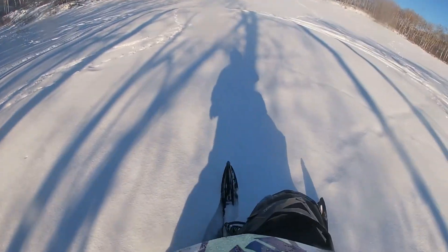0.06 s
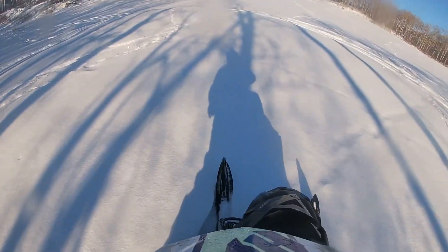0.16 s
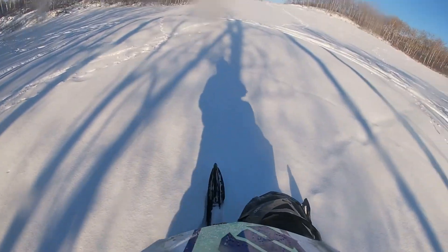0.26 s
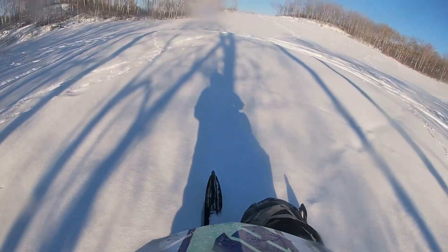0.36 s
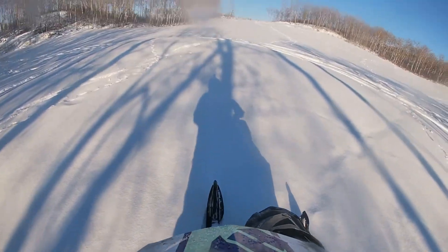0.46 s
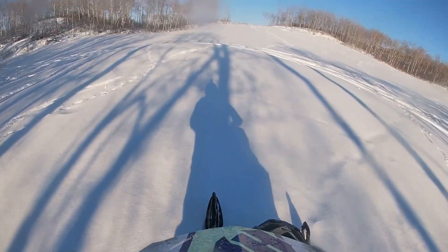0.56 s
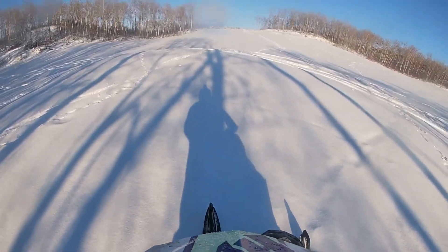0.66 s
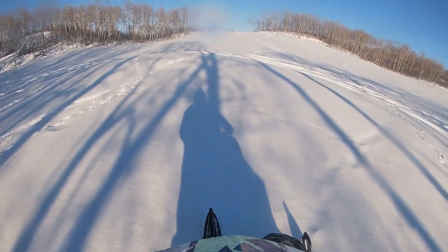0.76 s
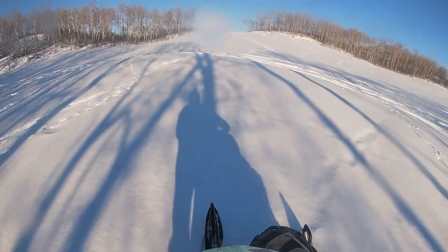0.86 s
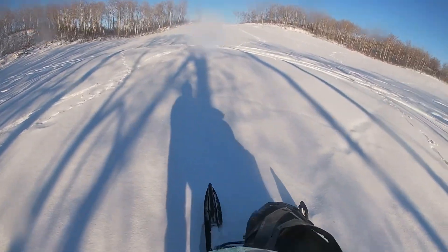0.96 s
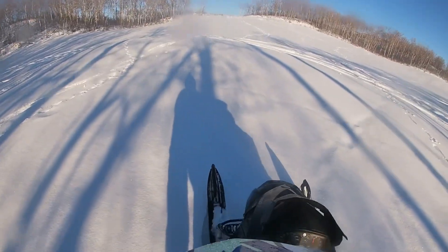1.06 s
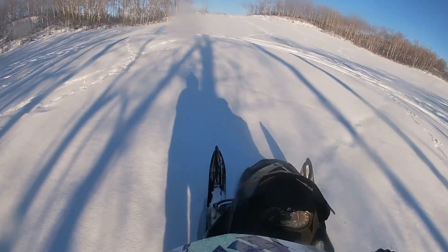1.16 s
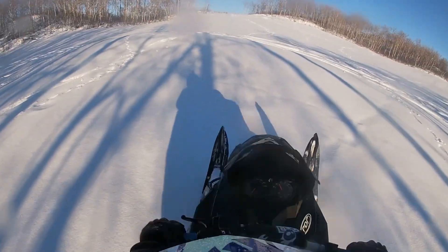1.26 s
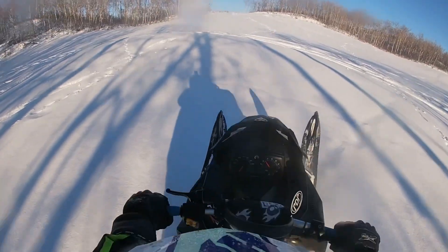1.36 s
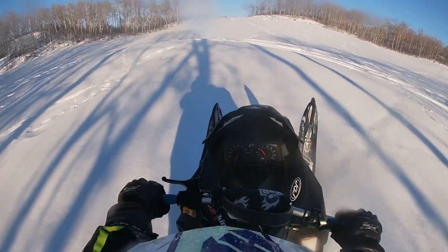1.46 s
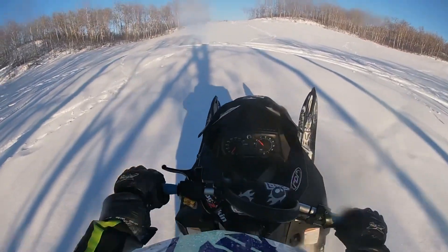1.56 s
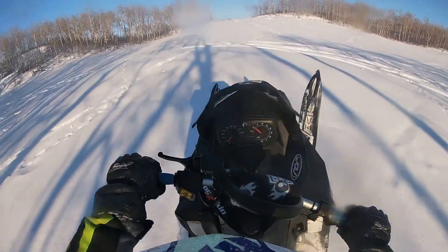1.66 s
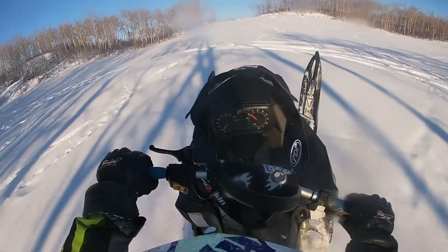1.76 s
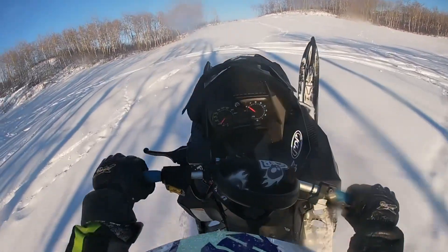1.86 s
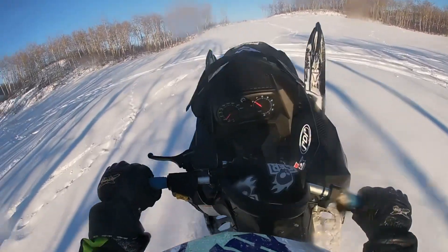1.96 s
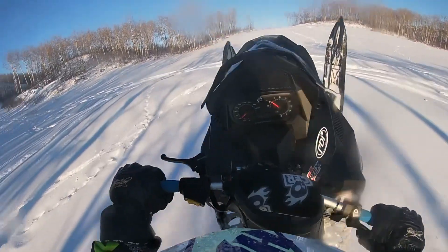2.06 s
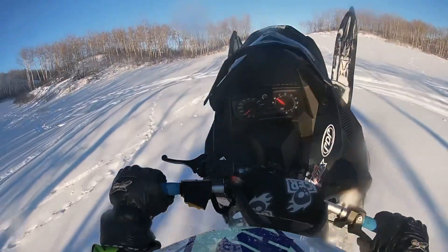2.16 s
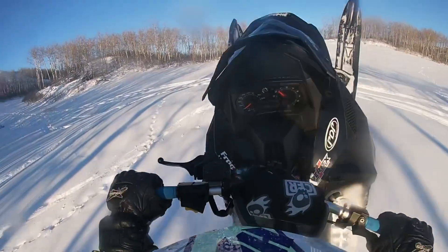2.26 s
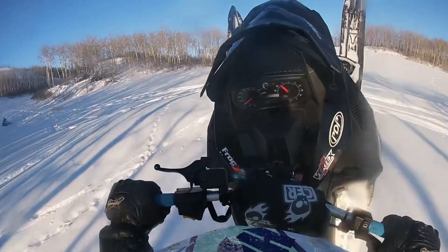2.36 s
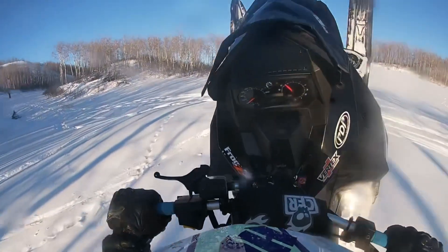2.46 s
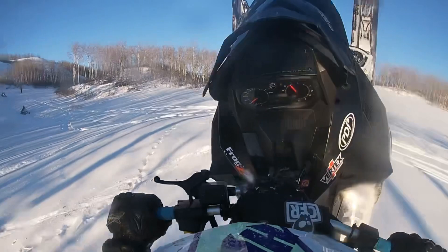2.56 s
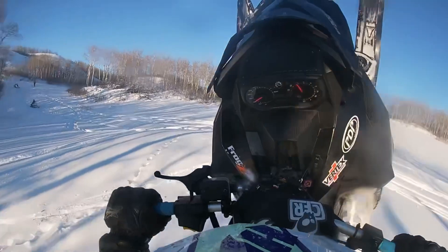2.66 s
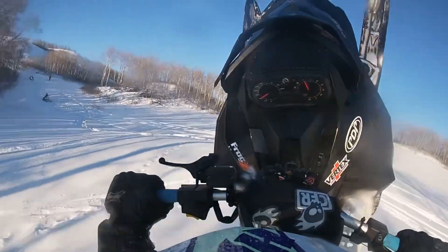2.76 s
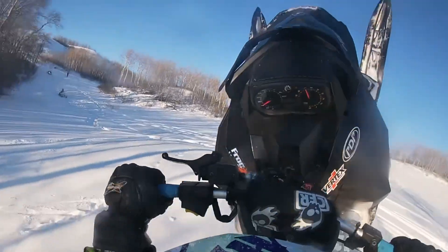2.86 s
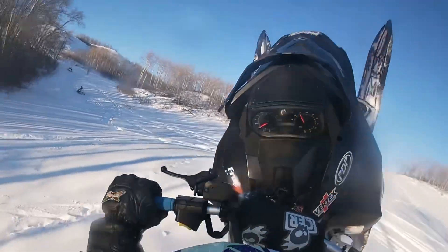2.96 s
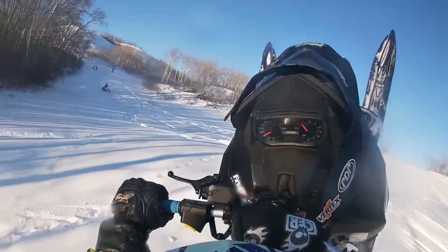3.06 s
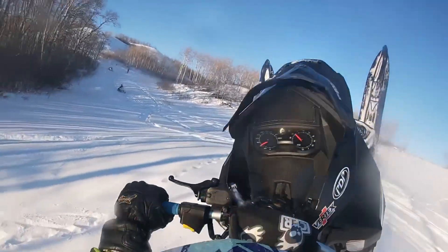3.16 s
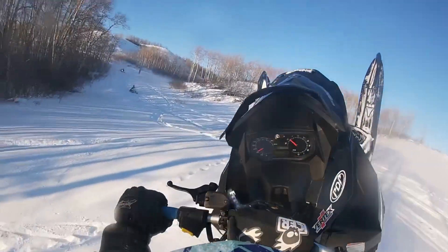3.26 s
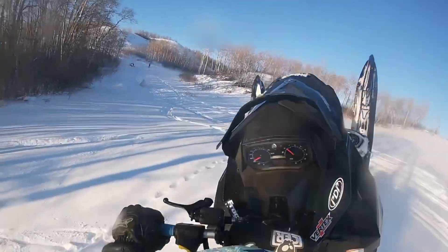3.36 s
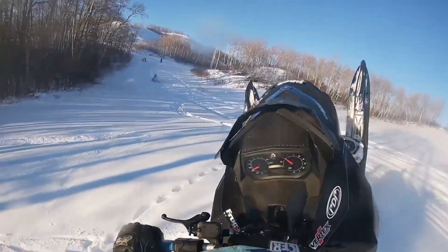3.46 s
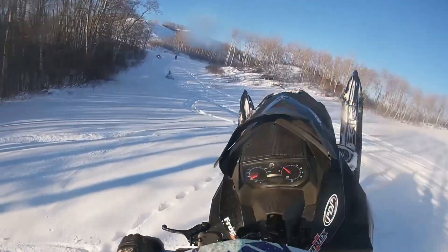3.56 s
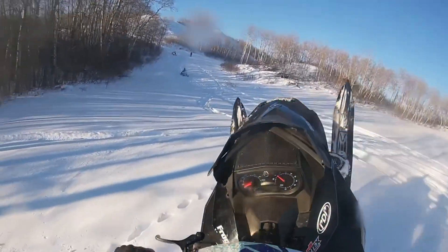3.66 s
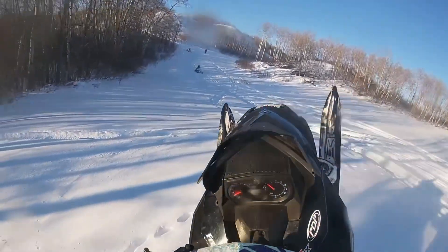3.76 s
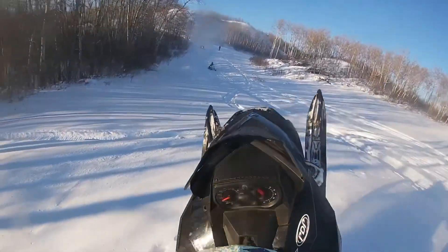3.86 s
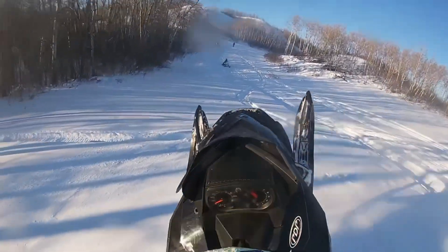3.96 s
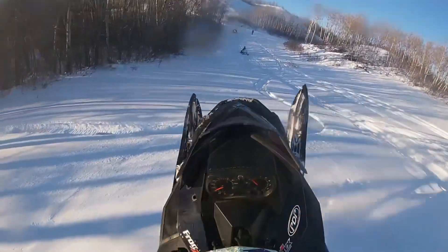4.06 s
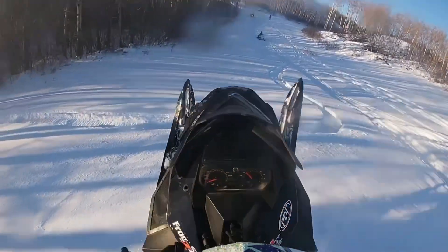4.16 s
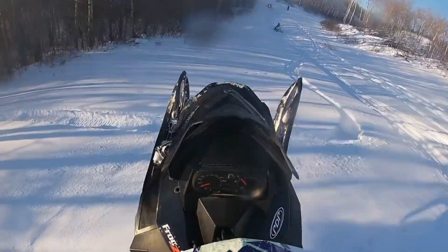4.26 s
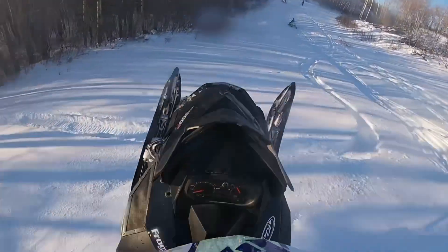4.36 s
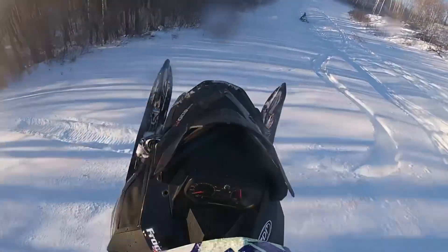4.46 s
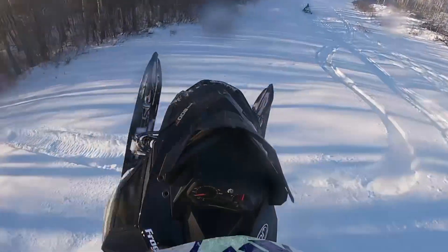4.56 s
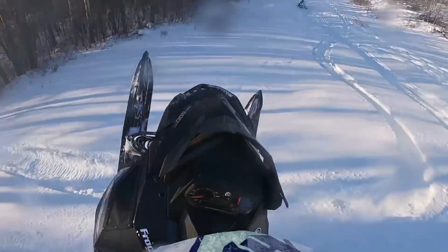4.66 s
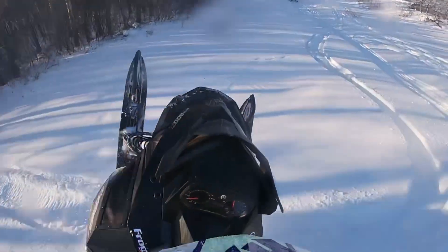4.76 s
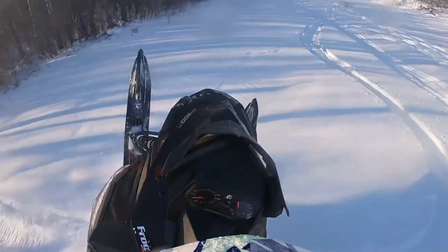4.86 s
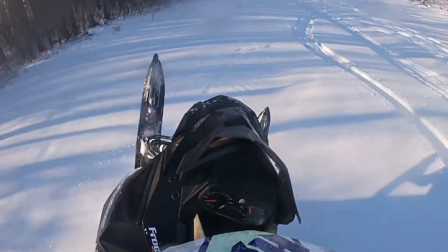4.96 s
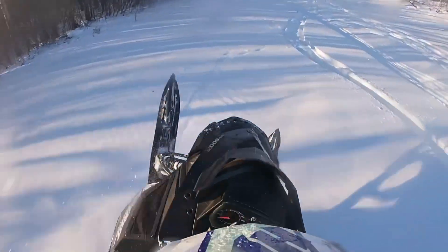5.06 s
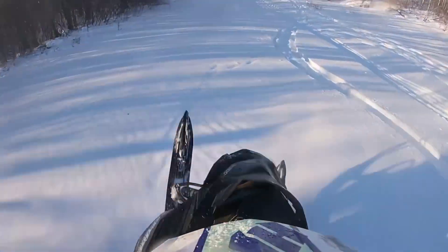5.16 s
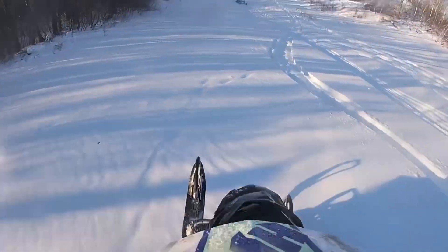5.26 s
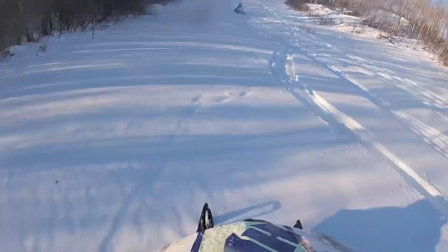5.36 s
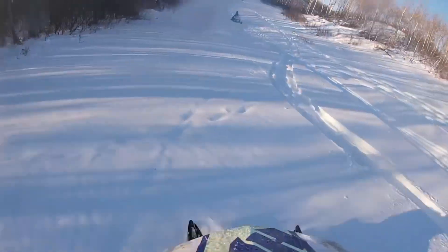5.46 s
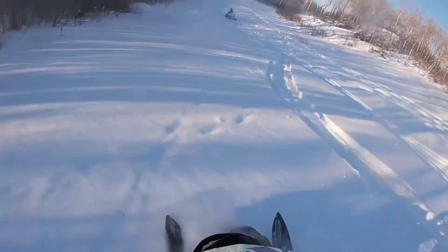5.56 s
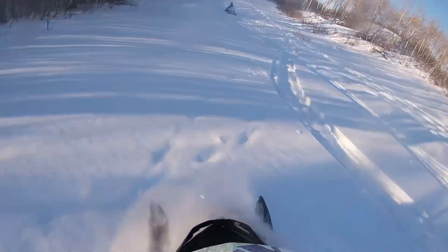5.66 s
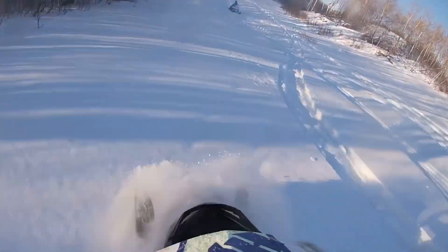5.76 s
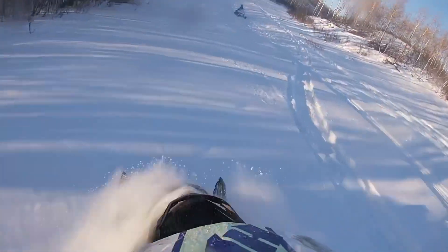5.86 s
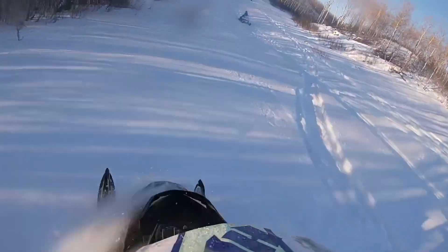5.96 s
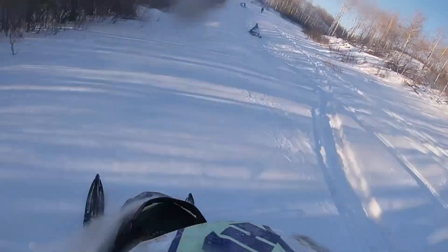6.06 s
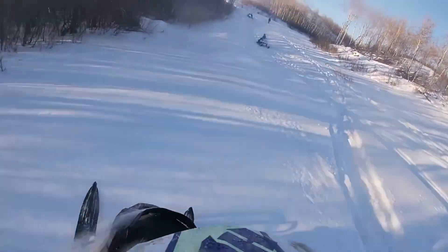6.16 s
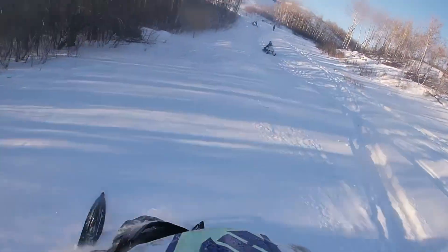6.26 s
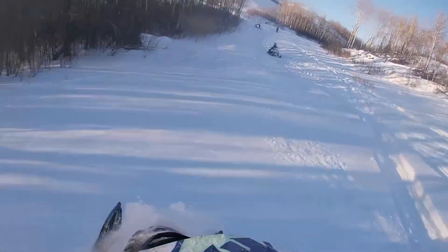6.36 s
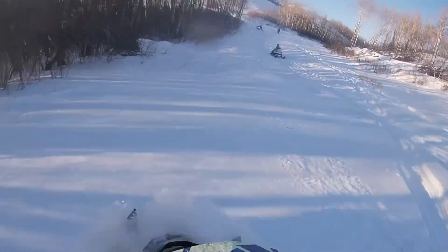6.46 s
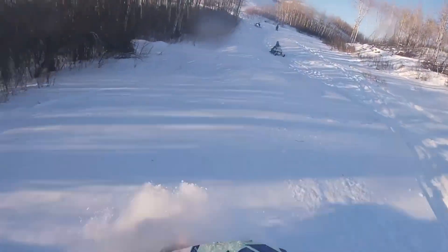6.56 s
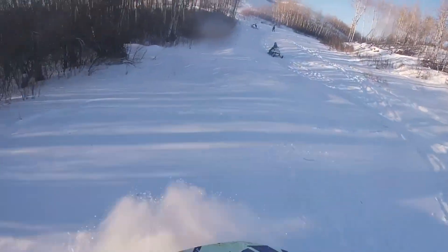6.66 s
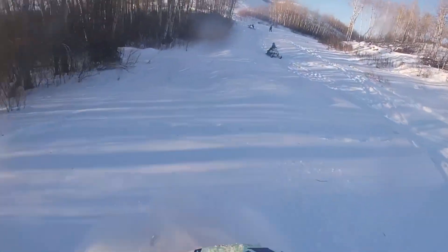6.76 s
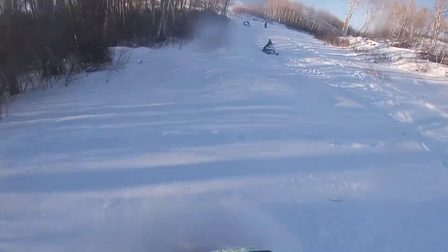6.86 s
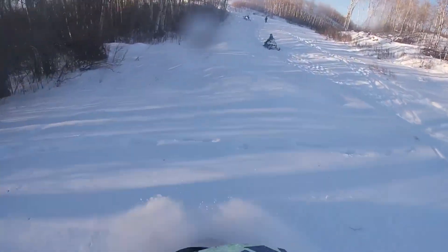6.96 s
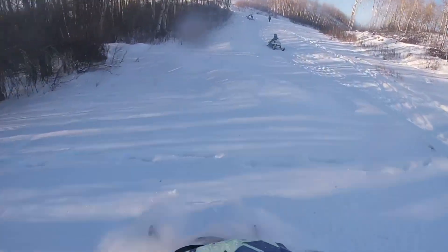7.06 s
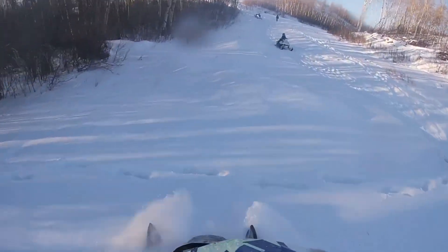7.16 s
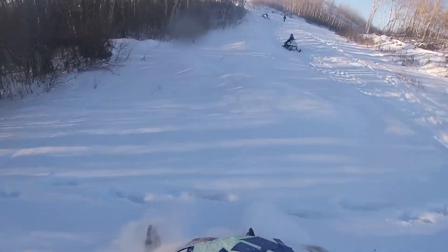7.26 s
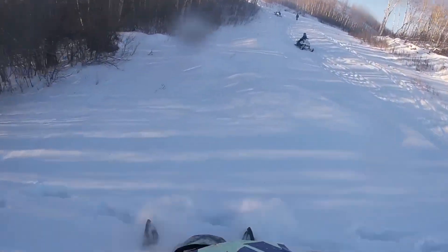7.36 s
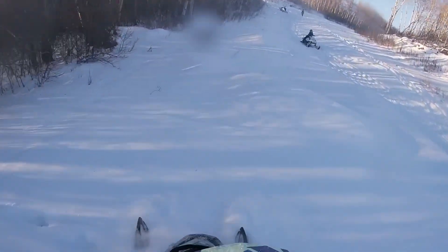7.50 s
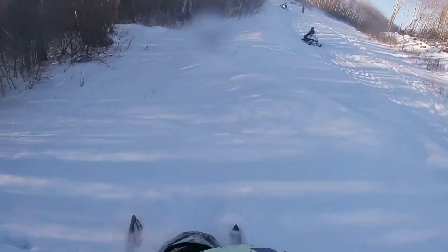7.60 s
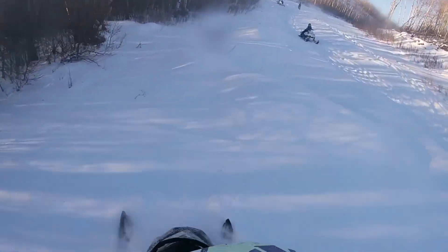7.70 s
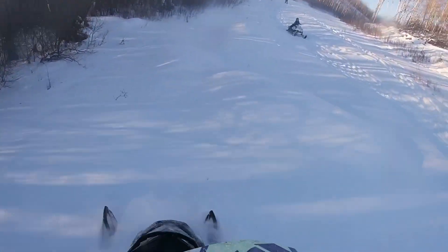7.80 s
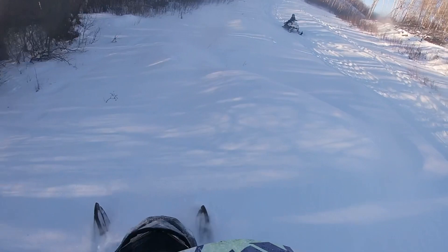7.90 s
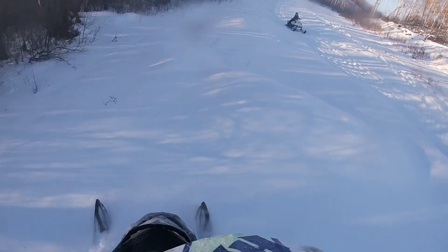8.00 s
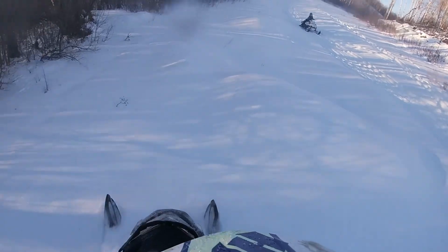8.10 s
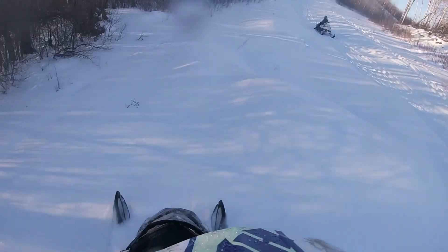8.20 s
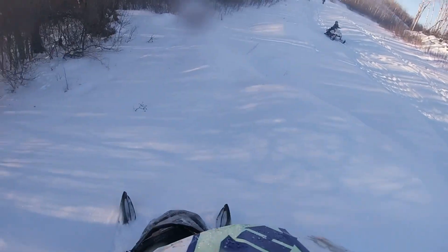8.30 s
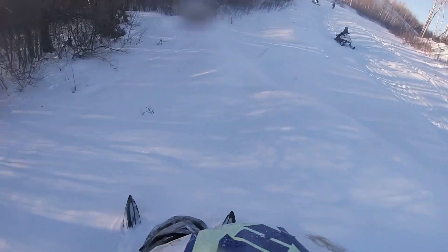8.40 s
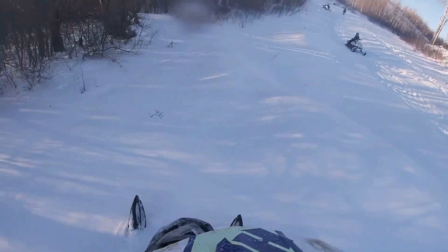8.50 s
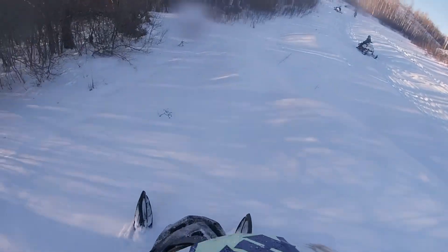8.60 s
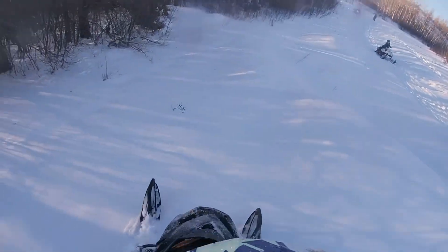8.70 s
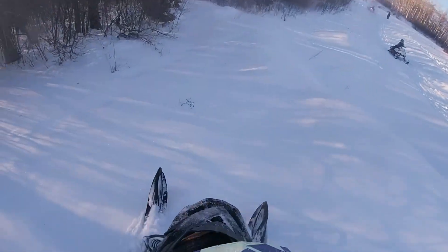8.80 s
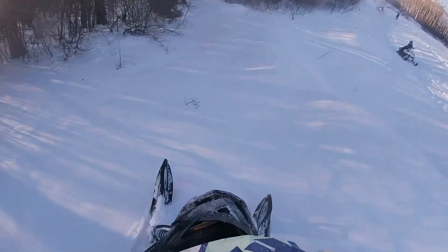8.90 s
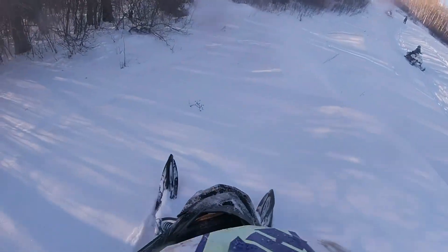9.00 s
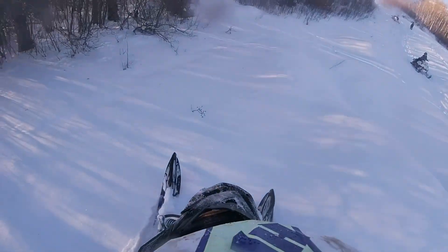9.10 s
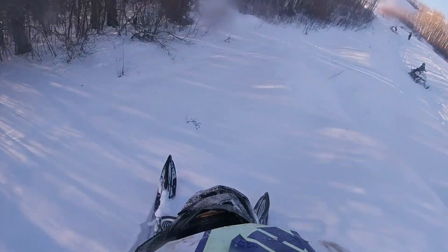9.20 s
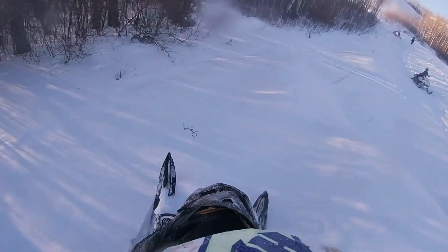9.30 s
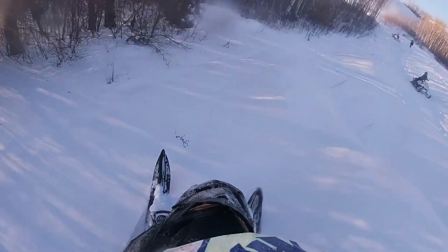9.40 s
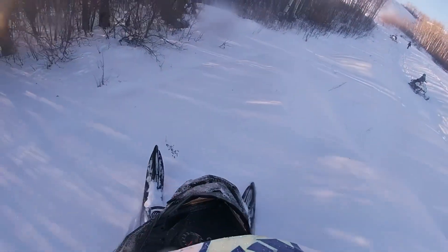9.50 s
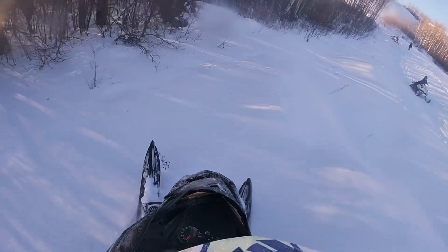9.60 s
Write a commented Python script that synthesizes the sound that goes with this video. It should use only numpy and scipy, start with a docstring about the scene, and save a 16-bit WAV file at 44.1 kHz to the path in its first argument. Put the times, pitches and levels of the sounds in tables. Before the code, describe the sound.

A snowmobile engine revs up to a high whine through deep snow, slows in gusty wind, then revs briefly three times.

```python
"""A two-cylinder two-stroke snowmobile rides through deep snow, heard from a closed case on a helmet.
First the engine's hum sags while wind buffets the case. At 1 s it revs up: exhaust pulses whine
through the pipe and hood, and the lugs (ridges) that drive the track drone. After 5 s it slows and
the whine gives way to the rasp of gas at each firing. Gusts hit, panels ring, and by 7 s the drone
fades. From 8.3 s the engine revs briefly three times and bumps thud through the seat."""
import sys
import numpy as np
from scipy import signal
from scipy.fft import rfft, irfft, next_fast_len
from scipy.io import wavfile
from scipy.ndimage import uniform_filter1d

SR = 44100
rng = np.random.default_rng(int(sys.argv[2]) if len(sys.argv) > 2 else 0)


def master_out(mix):
    """Clip the mix to full scale and print it as 16-bit PCM to the path in sys.argv[1]."""
    frames = np.transpose(np.atleast_2d(mix))
    ceiling = np.clip(frames, -1, 1)
    pcm = np.round(ceiling * 32767).astype(np.int16)
    wavfile.write(sys.argv[1], SR, pcm)


N = 425124


def from_db(db):
    """Turn decibels into a number to multiply by."""
    return 10 ** (np.asarray(db) / 20)


def rms_one(x):
    """Scale a signal so that its average strength (rms) is 1."""
    return x / np.sqrt(np.mean(x ** 2) + 1e-20)


def in_time(rows):
    """Join a table's points into one curve over time for each column."""
    times, *columns = np.transpose(rows)
    return [np.interp(np.arange(N) / SR, times, column) for column in columns]


def by_speed(rows, speed):
    """Look up a table's value at the engine's speed."""
    return np.interp(speed, *np.transpose(rows))


def drift(rate_hz, step=1):
    """A smooth random wobble of about 1 either way, given at every step-th sample."""
    r = np.exp(-80 * np.pi * rate_hz / SR)
    slow = signal.lfilter([1], [1, -2 * r, r * r], rng.standard_normal(N // 40 + 2002))[2000:]
    return np.interp(np.arange(0, N, step) / 40, np.arange(len(slow)), rms_one(slow))


def swell(t, start, end, fade):
    """Fade in around the start and out around the end, between 0 and 1."""
    ramp = np.minimum(t - start + fade / 2, end - t + fade / 2) / fade
    return np.sin(np.pi / 2 * np.clip(ramp, 0, 1)) ** 2


def bursts(rows):
    """One smooth swell around each listed time."""
    t = np.arange(N) / SR
    return sum(from_db(db) * swell(t, at - span / 2, at + span / 2, span) for at, span, db in rows)


def tone(angle, db, waver_db):
    """A pure tone whose level wavers."""
    level = from_db(db + waver_db * (drift(18) + .4 * drift(4)))
    return np.sqrt(2) * level * np.sin(angle + rng.uniform(0, 2 * np.pi))


# Resonances, the pitches that the hood boosts: f/Hz, width/Hz, boost/dB
HOOD_RESONANCES = [(1210, 26, 6.5), (1534, 380, 4), (1735, 43, 6), (2470, 66, 7.5), (3130, 46, 3),
                   (3470, 59, 5.5), (863, 84, 6), (6780, 240, 7), (8260, 380, 4), (9800, 500, 2.5),
                   (12700, 790, -0.5)]
def colour_db(spectrum, hz):
    """Read a spectrum (a level for each pitch) and add the hood's resonances."""
    table_hz, table_db = np.transpose(spectrum)
    db = np.interp(np.log(hz + 1), np.log(table_hz), table_db)
    return db + sum(boost / (1 + (2 * (hz - f) / width) ** 2) for f, width, boost in HOOD_RESONANCES)


def coloured(x, spectrum):
    """Shape a sound with a spectrum and the hood's resonances; its strength comes out as 1."""
    size = next_fast_len(N)
    gain = from_db(colour_db(spectrum, np.fft.rfftfreq(size, 1 / SR)))
    return rms_one(irfft(rfft(x, size) * gain, size)[:N])


# Steady wind and snow: t/s, buffeting level/dB, snow level/dB
WIND_LEVELS = [(0.0, -44, -25), (0.5, -40, -37), (1.3, -37, -28), (2.0, -54, -28), (2.6, -45, -25),
               (3.4, -45, -26), (4.9, -40, -29.5), (5.5, -34, -30.5), (7.0, -34.5, -27.5),
               (8.5, -33.5, -30), (9.64, -34, -31)]
# Gusts that hit the case: t/s, length/s, level/dB
WIND_GUSTS = [(.1, .2, -27), (1.02, .3, -30), (2.87, .5, -36), (5.2, .3, -32), (5.82, .3, -24.5),
              (6.52, 0.38, -21.5), (7.5, 0.26, -32), (8.27, 0.2, -30.5)]
# Tone colour of the rushing snow: f/Hz, relative level/dB
SNOW_SPECTRUM = [(40, -16.5), (80, 0), (150, -2.5), (300, -2), (450, -9.5), (700, -33)]
# Powder thrown up as the skis come down: t/s, length/s, level/dB
SNOW_SPRAYS = [(5.16, .15, -26), (5.82, .15, -30), (8.28, .12, -25)]
def wind_and_snow():
    """Wind beats on the case in low lumps while snow rushes under the sled."""
    buffet_db, snow_db = in_time(WIND_LEVELS)
    rumble = signal.sosfilt(signal.butter(3, [5, 28], "band", fs=SR, output="sos"), rng.standard_normal(N))
    rush = coloured(rng.standard_normal(N), [(10, -42)] + SNOW_SPECTRUM + [(1200, -61.5), (4000, -95)])
    buffet = (from_db(buffet_db + 4 * drift(3)) + bursts(WIND_GUSTS)) * from_db(1.9 * drift(11))
    snow = (from_db(snow_db) + bursts(SNOW_SPRAYS)) * from_db(2.14 * drift(9.1))
    return buffet * rms_one(rumble) + snow * rush


# Bumps in the ground: t/s, starting level/dB, f/Hz
GROUND_BUMPS = [(9.3, -14, 160), (9.4, -12, 110), (9, -15, 130), (8.6, -16, 230), (3.6, -11, 180)]
def bumps():
    """Each bump comes through the seat as a dull thud that dies in about two swings."""
    out, t = np.zeros(N), np.arange(2000) / SR
    for start, db, hz in GROUND_BUMPS:
        at = round(start * SR)
        out[at:at + len(t)] -= from_db(db) * np.sin(2 * np.pi * hz * t) * np.exp(-t * hz / 0.99)
    return out


# Panels that ring for a while: f/Hz, width/Hz, start t/s, end t/s, level/dB
PANEL_RINGS = [(2432, 70, 7.7, 8.3, -41), (852, 26, 7.35, 8.4, -45), (1730, 25, 5.93, 7.12, -34),
               (1745, 45, 6.1, 6.45, -31), (1580, 120, 0.67, 1.23, -21.5), (1857, 73, 0.71, 1.286, -24.5),
               (2440, 58, 2.74, 3.23, -29.5), (1480, 50, 9.3, 9.7, -31), (2450, 48, .05, .63, -39)]
def panels():
    """Random shaking makes each panel ring near its own pitch."""
    out, t = 0, np.arange(N) / SR
    for hz, width, start, end, db in PANEL_RINGS:
        r = np.exp(-np.pi * width / SR)
        resonance = [1, 0, -1, 1, -2 * r * np.cos(2 * np.pi * hz / SR), r * r]
        ring = signal.sosfilt([resonance, resonance], rng.standard_normal(N))   # twice: a purer ring
        out = out + from_db(db) * swell(t, start, end, fade=.2) * rms_one(ring)
    return out


# How many lugs pass each second: t/s, f/Hz
LUG_RATE = [(.95, 130), (1.2, 172), (1.4, 192), (1.8, 219), (2.05, 244), (2.3, 246), (2.6, 240), (2.8, 245),
            (3.12, 280), (3.3, 274), (3.6, 268), (4.2, 245), (5.1, 200), (5.3, 168), (5.5, 146),
            (5.95, 128), (6.35, 107), (6.7, 84)]
# The track's two tones: t/s, every-lug level/dB, every-second-lug level/dB
TRACK_LEVELS = [(.85, -63, -60), (1.05, -24, -36), (1.3, -32, -33), (1.7, -23, -32), (2.1, -33, -26),
                (2.7, -38, -26.5), (2.95, -33, -33), (3.05, -21, -34), (3.55, -22, -24), (3.8, -40, -29),
                (4.25, -24, -26), (4.4, -58, -58), (5.15, -57, -58), (5.4, -24, -28), (5.6, -26.5, -21),
                (6.1, -37, -39), (6.5, -28, -37), (6.85, -60, -57)]
def track():
    """The passing lugs drone at their own rate and at half of it."""
    lug_hz, = in_time(LUG_RATE)
    lug_db, half_db = in_time(TRACK_LEVELS)
    angle = 2 * np.pi * np.cumsum(lug_hz) / SR
    return tone(angle, lug_db, waver_db=0.1) + tone(angle / 2, half_db, waver_db=0.5)


# The low hum: t/s, then level/dB for each of orders 1, 2, 4 and 6
HUM_LEVELS = [(0.0, -29.5, -19.5, -21.5, -38), (0.26, -34, -28, -30, -35), (0.45, -34, -38, -50, -44),
              (0.6, -37, -24, -44, -46), (0.72, -35, -16, -28, -31), (0.95, -19, -18, -23, -33),
              (1.12, -18, -14.5, -36, -37), (1.26, -19.5, -9.5, -27, -37), (1.63, -19, -19, -20.5, -29),
              (1.98, -19.5, -13.5, -19, -33), (2.35, -19.5, -24, -19.5, -27), (2.66, -20, -23, -18, -31),
              (2.82, -43, -21.5, -16, -37), (2.97, -18.5, -19, -21, -35), (3.5, -17, -14.5, -20.5, -30),
              (3.9, -18, -18, -22, -31), (4.3, -21, -14.5, -23, -32), (4.47, -25, -16, -17, -34),
              (4.72, -18, -13, -36, -37), (5.0, -20, -10, -30.5, -35), (5.1, -21.5, -19, -40, -35),
              (5.2, -22, -21, -24, -37), (5.4, -30, -24, -27, -33), (5.6, -30, -38, -33, -52),
              (5.82, -27, -24, -22.5, -42), (5.95, -36, -27.5, -31, -46), (6.2, -31.5, -25.5, -30, -37),
              (6.4, -31, -28, -37, -39), (6.9, -31, -31.5, -23, -52), (7.1, -31, -38, -40, -31),
              (7.34, -31, -39, -37, -35), (7.8, -30, -45, -28.5, -29), (8.2, -32, -40, -25, -28),
              (8.3, -27, -24.5, -38, -27), (8.38, -43, -27, -15.5, -24), (8.5, -44, -30, -19, -27),
              (8.89, -28, -25, -19, -28), (9.05, -42, -30, -26, -36), (9.4, -32, -32, -22, -36),
              (9.63, -37, -28, -31, -40)]
# Flutter from uneven firing: crank f/Hz, level/dB
FLUTTER_LEVELS = [(58, -29), (62, -31), (66, -43), (90, -44.5), (112, -36), (129, -44)]
def hum(speed, angle):
    """The crank (the engine's shaft) hums in orders: order k swings k times in each turn."""
    steady = sum(tone(k * angle + 0.14 * drift(11), db, waver_db)
                 for k, db, waver_db in zip((1, 2, 4, 6), in_time(HUM_LEVELS), (1.7, 1.0, 0.81, 2.4)))
    # a cylinder that fires weakly now and then makes the odd orders flutter
    flutter_db = by_speed(FLUTTER_LEVELS, speed)
    flutter = sum(tone(k * angle + .5 * drift(12), flutter_db + db, waver_db=3)
                  for k, db in ((3, 0), (5, 0), (7, -7)))
    return steady + flutter


# Tone colour of the rasp at low speed: f/Hz, relative level/dB
SLOW_RASP = [(320, -34), (550, -10), (618, -11.5), (845, -12.5), (940, -17.5), (1320, -8.5), (1460, 0),
             (1590, -7), (1720, -3), (2030, -16.5), (2420, -12.5), (2830, -15.5), (3270, -8.5), (4300, -16),
             (5280, -25.5), (5800, -27), (6400, -40), (8000, -43.5), (9800, -48), (10800, -66),
             (13000, -63), (15000, -80)]
# The same at full throttle: f/Hz, relative level/dB
FAST_RASP = [(320, -36), (550, -8), (700, -7), (940, -13.5), (1200, -8.5), (1460, -1), (1720, -10.5),
             (2030, -11.5), (2420, -10), (2830, -9), (3270, -8), (4300, -12), (5280, -25), (5800, -24),
             (6400, -38), (8000, -41), (9800, -42), (10800, -54.5), (13000, -56), (15000, -68.5)]
def gas_rasp(speed, angle, bright_db):
    """Gas puffs noisily out of the pipe at each firing; more throttle lifts the treble."""
    puff = 1 + 0.13 * np.cos(2 * angle) + 0.084 * np.cos(angle)
    gas = rng.standard_normal(N) * puff * from_db(1.03 * drift(26))
    fast = np.clip((speed - 95) / 18, 0, 1)
    rasp = (1 - fast) * coloured(gas, SLOW_RASP) + fast * coloured(gas, FAST_RASP)
    low, treble = (signal.sosfilt(signal.butter(4, 2100, kind, fs=SR, output="sos"), rasp)
                   for kind in ("low", "high"))
    return low + from_db(bright_db) * treble


# Tone colour of the exhaust pulses: f/Hz, relative level/dB
PULSE_SPECTRUM = [(260, -30), (450, 1), (539, -11), (772, -5.5), (905, -20), (1260, -8.5), (1590, -11),
                  (2350, -15.5), (3120, -12), (3330, -16), (4200, -16), (5250, -29.5), (5650, -26),
                  (7340, -50.5), (12400, -120)]
# Odd orders are weak, made only by the cylinders being unequal: crank f/Hz, level change/dB
ODD_ORDER_CUT = [(108, -6), (118, -10), (124, -16)]
# How far the pulses stand out from the rasp: crank f/Hz, level change/dB
PULSE_BOOST = [(60, -6), (70, -10), (85, -11.5), (105, -4), (115, 4), (130, 0.5)]
# Orders that sing out as they meet a resonance: order -> (start t/s, end t/s, level/dB)
SINGING_ORDERS = {8: [(1.7, 2.25, -34)], 14: [(2.5, 2.9, -30), (3.5, 4.1, -32)], 38: [(1.5, 2.1, -44)],
                  9: [(2.8, 3.0, -27)], 10: [(2.2, 2.65, -23.5), (3.65, 4.35, -26)], 11: [(1.6, 2.3, -27.5),
                  (3.3, 4.2, -30)], 12: [(1.1, 1.62, -21), (3.6, 4.2, -34), (4.35, 4.9, -25)],
                  13: [(1.465, 1.97, -25)], 16: [(3.05, 3.7, -32.5), (4.85, 4.96, -26)],
                  20: [(2.15, 2.5, -30), (2.9, 3.1, -27)], 22: [(1.6, 2.05, -33), (4.5, 4.7, -30)],
                  24: [(1.6, 2.0, -29), (3.1, 3.7, -29.5), (4.1, 4.3, -33)], 26: [(1.6, 2.0, -29),
                  (3.1, 3.3, -32), (4.5, 4.7, -31)], 17: [(4.7, 4.95, -31)], 21: [(2.85, 3.05, -32)],
                  25: [(4.8, 4.98, -32)], 27: [(4.88, 4.99, -27)], 28: [(2.3, 2.5, -31), (2.9, 3.1, -29)],
                  32: [(3.1, 3.5, -35)]}
def exhaust_whine(speed, angle, exhaust_db):
    """Exhaust pulses follow so fast that they whine: a stack of high orders, each wavering alone."""
    step = 256   # samples between level updates
    out, samples, updates = np.zeros(N), np.arange(N), np.arange(0, N, step)
    orders, crank_hz = np.arange(8, 48), speed[::step]
    odd_db = by_speed(ODD_ORDER_CUT, crank_hz) * (orders[:, None] % 2)
    gains = from_db(colour_db(PULSE_SPECTRUM, orders[:, None] * crank_hz) + odd_db)
    pulse_db = exhaust_db[::step] + by_speed(PULSE_BOOST, crank_hz)
    gains *= from_db(pulse_db) / np.sqrt((gains ** 2).sum(axis=0))
    glide = np.abs(np.gradient(uniform_filter1d(speed, size=2048))) * SR   # speed change, Hz per s
    gains[1:] *= np.clip((crank_hz - 85) / 35, .12, 1)   # the whine fades at low speed
    gains /= 1 + glide[::step] / 160   # and while the speed changes
    shaky_angle = angle + (0.013 + 0.00014 * glide) * drift(15)
    for k, gain in zip(orders, gains):
        gain = gain * from_db(3.66 * drift(5.3, step))
        for start, end, db in SINGING_ORDERS.get(k, []):
            gain += from_db(db + 3.2 * drift(9.4, step)) * swell(updates / SR, start, end, fade=0.091)
        out += np.interp(samples, updates, gain) * np.sin(k * shaky_angle + rng.uniform(0, 2 * np.pi))
    return np.sqrt(2) * out


# How many turns the crank makes each second: t/s, f/Hz
CRANK_SPEED = [(0.0, 87.2), (0.1, 88.5), (0.23, 75.8), (0.37, 67.0), (0.48, 63.5), (0.58, 63.6),
               (0.7, 72.4), (0.84, 90.7), (1.1, 120), (1.2, 129.2), (1.34, 128.2), (1.67, 129.1),
               (2.16, 129.2), (2.32, 121.6), (2.49, 122.7), (2.73, 112.4), (2.84, 112.5), (3.1, 129.7),
               (3.27, 128.8), (3.4, 129.3), (4.09, 127.3), (4.3, 129.8), (4.44, 112.8), (4.54, 108.2),
               (4.67, 112), (4.86, 126.3), (4.99, 130.6), (5.2, 102.5), (5.31, 91.8), (5.45, 90.4),
               (5.86, 96), (6.04, 84.2), (6.17, 83.2), (6.3, 86), (6.44, 80.2), (6.86, 69.7), (7.19, 62.2),
               (7.62, 59.1), (8.26, 57.2), (8.32, 61.4), (8.47, 82.2), (8.65, 77.0), (8.9, 84.6),
               (9.04, 74.5), (9.38, 83.6), (9.63, 74.3)]
# The exhaust: t/s, base level/dB, treble change of the rasp/dB
EXHAUST_LEVELS = [(0.0, -18, -0.5), (0.16, -21, -1), (0.22, -25, -3), (0.69, -24.5, -4), (0.73, -20, -2.5),
                  (0.94, -18, -2), (1.08, -20, -3), (1.25, -26, 2.5), (2.15, -23.5, 1), (2.45, -23.5, -2.5),
                  (2.7, -23.5, -1.5), (3.1, -24, 4), (4.24, -23, -2), (4.48, -24.5, 2.5), (4.7, -20, -3),
                  (4.85, -23, 2), (5.22, -23.5, 0), (5.4, -26, -4.5), (6.25, -24, -1), (6.5, -31, 1),
                  (7.3, -29.5, -2.5), (8.3, -29, -1.5), (8.45, -24, -2.5), (8.67, -27, 1), (8.9, -25.5, 5),
                  (9.05, -27.5, 1.5), (9.4, -22.5, 3.5), (9.64, -26.5, 0)]
def engine():
    """One turning crank drives the hum, the rasp and the whine together."""
    speed, = in_time(CRANK_SPEED)
    speed = uniform_filter1d(speed, size=2048)   # the heavy flywheel smooths speed changes
    angle = 2 * np.pi * np.cumsum(speed) / SR
    exhaust_db, bright_db = in_time(EXHAUST_LEVELS)
    return (hum(speed, angle) + from_db(exhaust_db) * gas_rasp(speed, angle, bright_db)
            + exhaust_whine(speed, angle, exhaust_db))


def scene():
    """All the sounds meet at one microphone."""
    return (engine() + panels() + track() + bumps() + wind_and_snow())[None]


MIC_HISS_DB, CUTOFF_HZ = -73, 16000
def record(dry):
    """The microphone rounds off loud peaks, hisses faintly and loses the highest treble."""
    heard = 1.297 * np.tanh(dry / 1.689) + from_db(MIC_HISS_DB) * rng.standard_normal(N)
    return signal.sosfilt(signal.cheby2(12, 70, CUTOFF_HZ, fs=SR, output="sos"), heard)


dry = scene()
out = record(dry)
master_out(out)
```